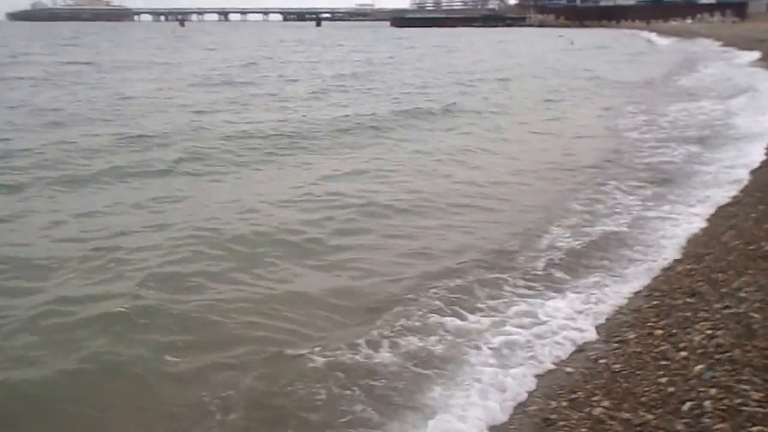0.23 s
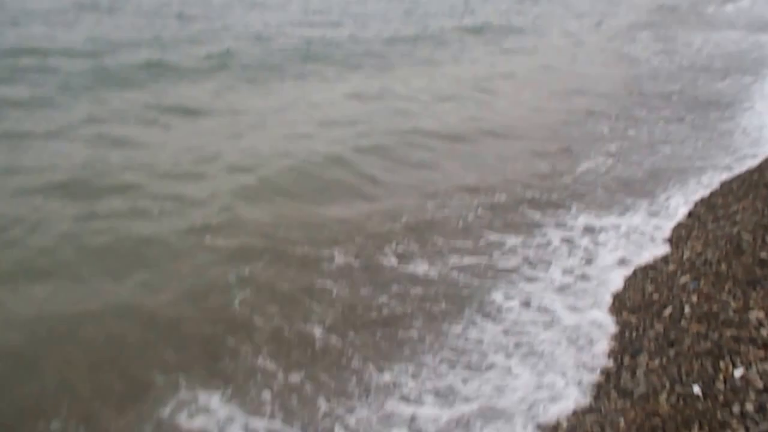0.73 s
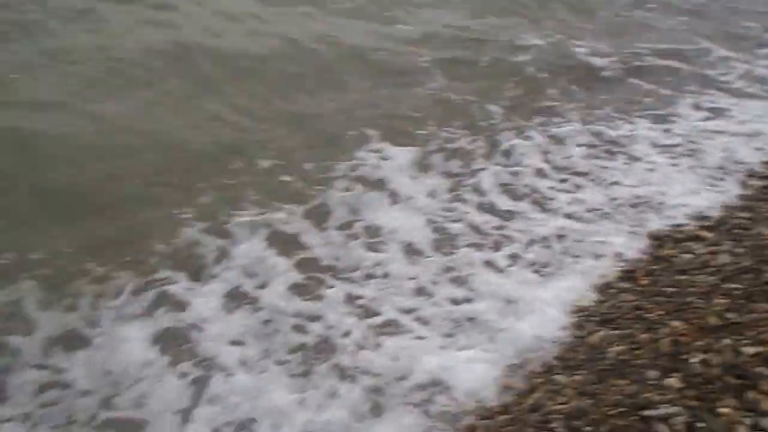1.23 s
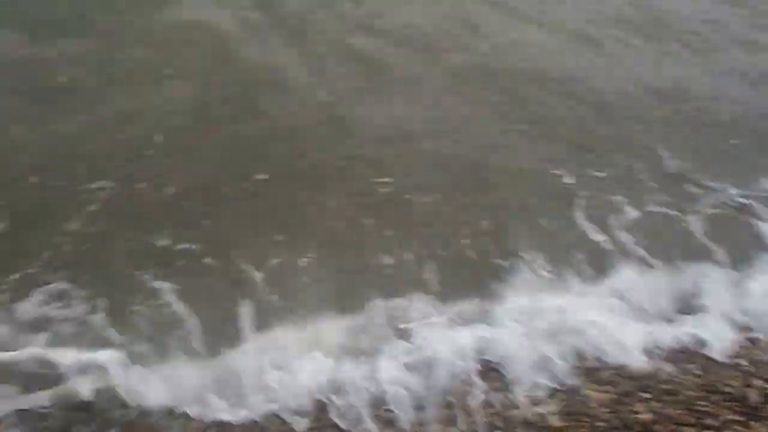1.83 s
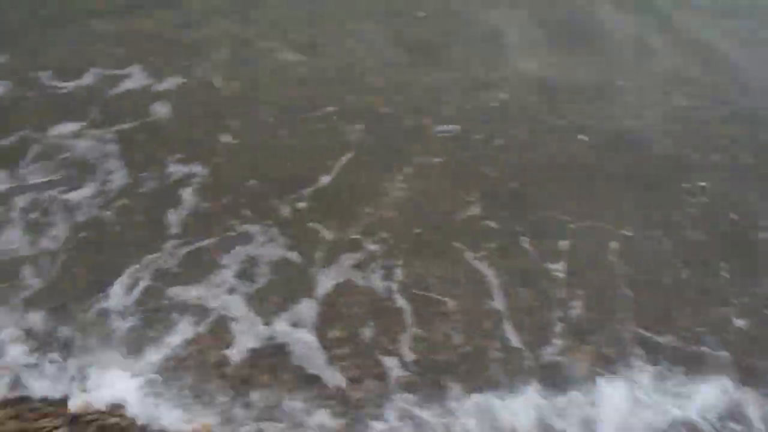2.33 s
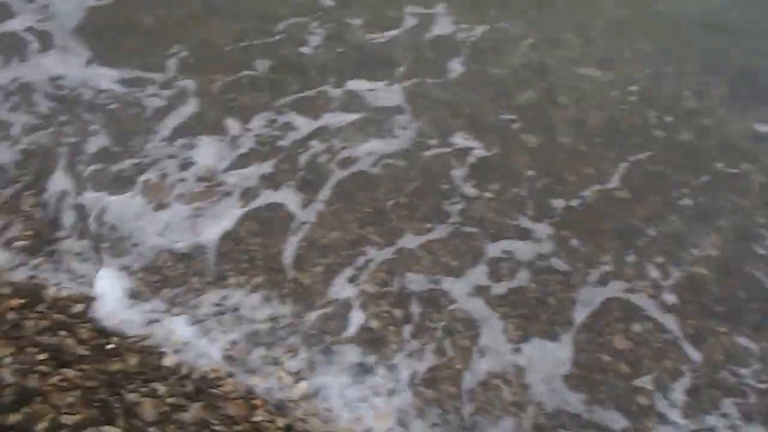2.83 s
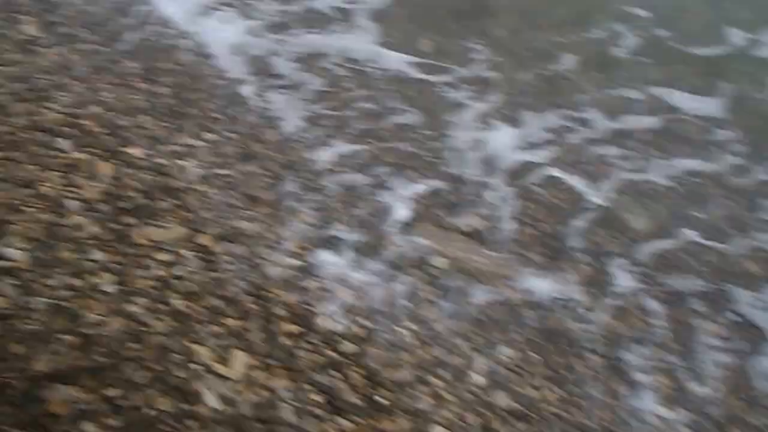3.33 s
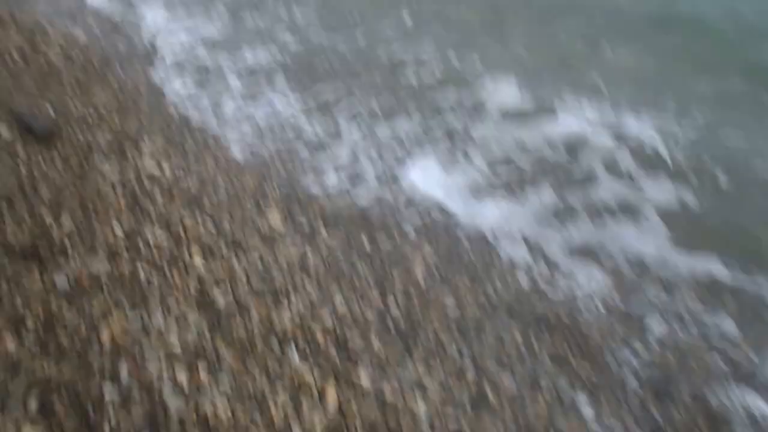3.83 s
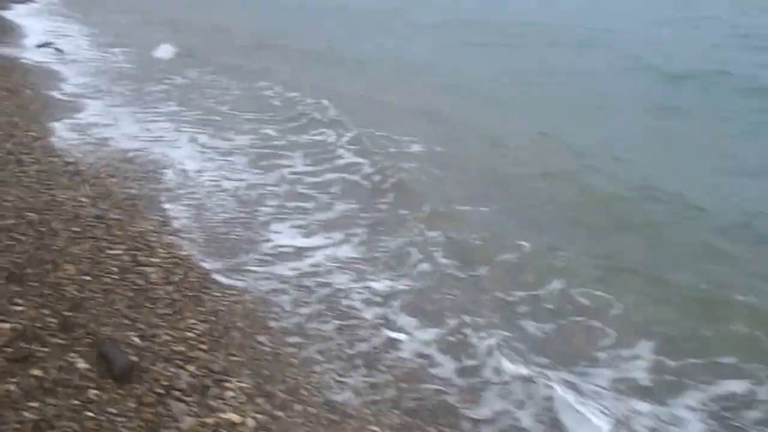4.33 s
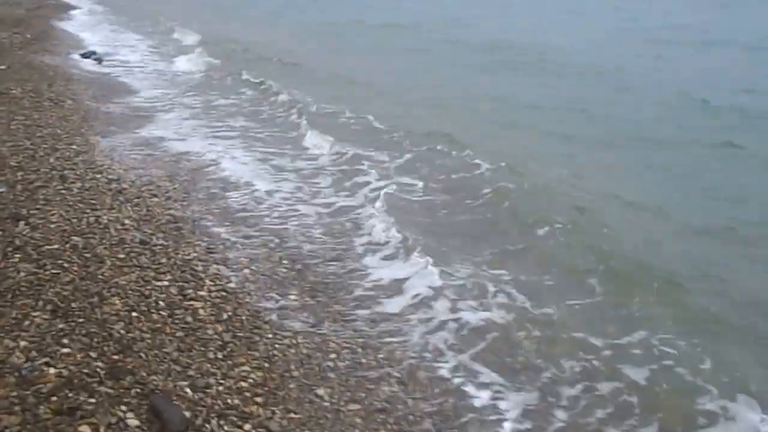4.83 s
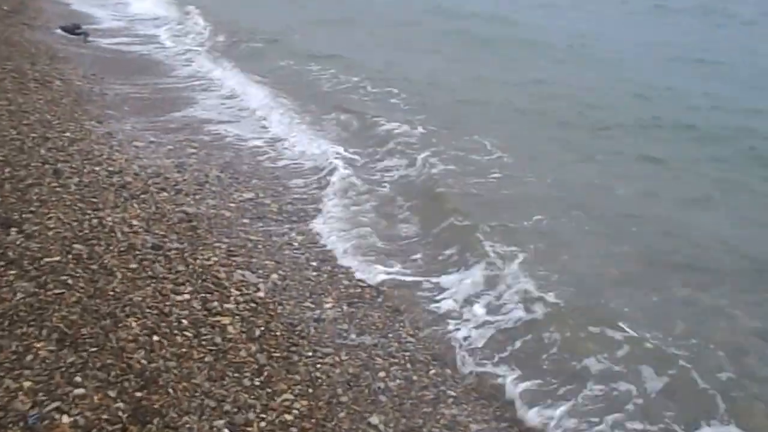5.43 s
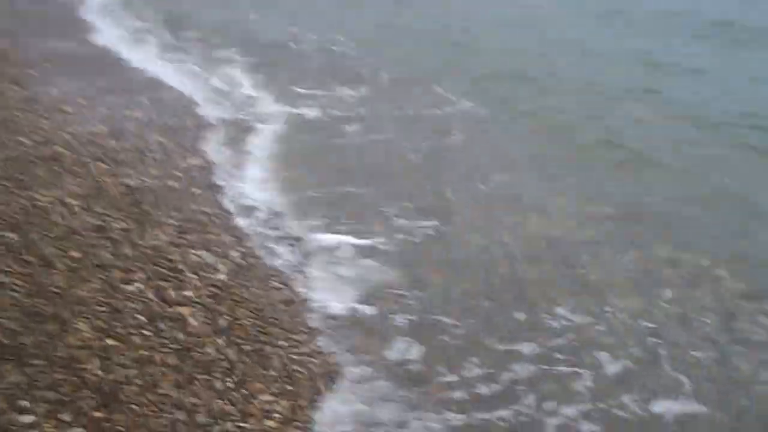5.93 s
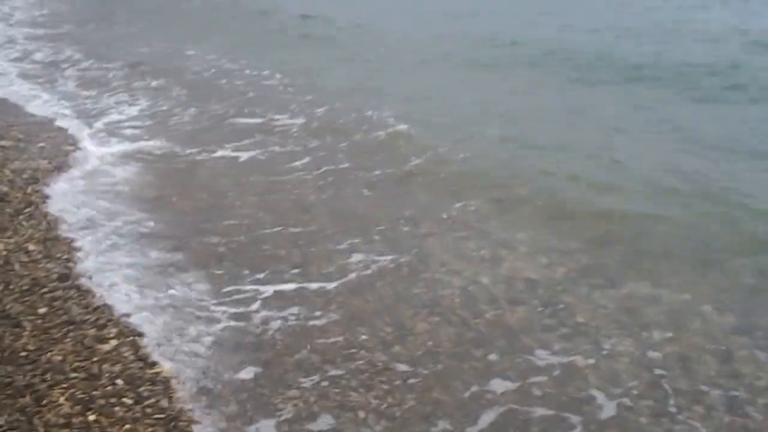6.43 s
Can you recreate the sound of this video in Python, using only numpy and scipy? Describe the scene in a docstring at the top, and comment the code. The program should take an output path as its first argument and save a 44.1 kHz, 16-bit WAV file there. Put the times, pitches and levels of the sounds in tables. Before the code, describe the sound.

Small waves wash continuously over a pebble beach, close to a hand-held mono microphone. The sound opens with a gurgling splash, fizzing foam and a brief crunch underfoot, while wind buffets the microphone until about 0.7 seconds. Several stones clack sharply just after 1 second. Foam swells near 1.8 seconds and another wave spills at 2, with plops and falling drops. The water is softer around 2.6 seconds, where a foot shifts in the shingle. Near 3.4 seconds come a crunch, a clack and several bubble plops, and the wind returns, rumbling and thumping to the end. A fuller wave breaks around 3.8 seconds, its hiss slightly hollow, and foam surges at 4.3 with another clack. Short steps crunch near 4.3, 5 and 6.3 seconds. A further wave splashes and fizzes around 5.8 seconds, followed by a smaller wash near 6.4.

```python
"""Small waves on a pebble beach

Waves spill close to a hand-held mono microphone. Trapped bubbles resonate, higher as they get smaller,
so each crest gurgles, then splashes and sprays, and its foam fizzes over the stones.
Feet shift in the shingle and single stones clack on impact.
Turbulent wind buffets the microphone at the start and again through the second half."""
import sys
import numpy as np
from scipy import signal
from scipy.fft import rfft, irfft, next_fast_len
from scipy.io import wavfile
from scipy.ndimage import uniform_filter1d, map_coordinates

SR = 44100
rng = np.random.default_rng(int(sys.argv[2]) if len(sys.argv) > 2 else 0)


def bounce(signal):
    """Save signal as a 16-bit WAV file at the path given by the first command-line argument."""
    frames = np.transpose(np.atleast_2d(signal))
    limited = np.clip(frames, -1, 1)
    pcm = np.round(limited * 32767).astype(np.int16)
    wavfile.write(sys.argv[1], SR, pcm)


N = 294588
TIME = np.arange(N) / SR
# spectrum of colliding pebbles: frequency_hz, gain_db
PEBBLE_SPECTRUM = [(150, -25), (400, -4), (1000, -0.5), (2200, -2), (4000, 1.5), (6000, 2.5), (8000, -1),
                   (11500, 0.5)]


def surf():
    """Bubble fragmentation: a crest's big bubbles split into smaller ones that resonate higher."""
    # spectra of big, medium and tiny bubbles: frequency_hz, gain_db
    gurgle_spectrum = [(25, -42), (80, -16), (140, -7.5), (260, 0), (450, -0.5), (620, -2), (850, -9),
                       (2000, -33)]
    splash_spectrum = [(200, -54), (480, -11.5), (720, 1), (1000, 1.5), (1300, -2), (1800, -12),
                       (4000, -43)]
    fizz_spectrum = [(1200, -19), (2300, -3.5), (3100, -1), (4300, 0), (5500, -1), (8000, -6),
                     (11500, -3.5)]
    # spectrum of small bubbles: frequency_hz, gain_db
    # its rise at 11 kHz is a faint, thin recorder hiss that follows the splashing
    spray_spectrum = [(600, -22), (1100, -5.5), (1500, 0), (2100, -2), (2700, -6.5), (3600, -10.5),
                      (8000, -28), (11000, -16.5)]
    # the finest hiss, where spray falls on fresh foam: frequency_hz, gain_db
    mist_spectrum = [(3000, -30), (5500, -17), (7500, -5), (11000, 3)]
    gurgle = crest_envelope(lag_in_rises=0, spray_share=0, shore_db=-39)
    splash = crest_envelope(lag_in_rises=0.31, spray_share=0.58, shore_db=-38)
    spray = crest_envelope(lag_in_rises=0.35, spray_share=0.93, shore_db=-36.5)
    fizz = foam_envelope(shore_db=-31.5)
    big = ring_cloud(169, 838, per_s=420, cycles=2.52, glide=0.026, spread_db=0.5)
    medium = ring_cloud(500.6, 1816, per_s=1100, cycles=4.25, glide=0.023, spread_db=1)
    small = ring_cloud(1110, 3510, per_s=2200, cycles=2.2, glide=0.027, spread_db=0.5)
    tiny = ring_cloud(2320, 10880, per_s=3200, cycles=2.5, glide=0.0092, spread_db=3)
    out = gurgle * water(big, gurgle_spectrum, wash_db=7, patch_db=0.6, flicker_db=0.3)
    out += splash * water(medium, splash_spectrum, wash_db=3.5, patch_db=0.17, flicker_db=1)
    out += spray * water(small, spray_spectrum, wash_db=4.5, patch_db=0.82, flicker_db=0.5)
    out += fizz * water(tiny, fizz_spectrum, wash_db=4.5, patch_db=0.5, flicker_db=0.5)
    out += amp(21.5) * spray * fizz * unit(colour(rng.standard_normal(N), mist_spectrum))
    return out + amp(-14.5) * np.sqrt(spray * fizz) * rattle(per_s=70, spread_db=4, ring_s=0.0018)


def crest_envelope(lag_in_rises, spray_share, shore_db):
    """Incoherent addition: for one bubble size, near crests and the steady shoreline sum in power."""
    # spilling crests: gurgle_peak_s, level_db, rise_s, decay_s, spray_over_gurgle_db
    crests = [(0.04, -26.6, 0.15, 0.42, 5), (0.52, -27.5, 0.44, 0.68, 5.5), (2.03, -28, 0.37, 0.29, -0.1),
              (2.62, -37, 0.34, 0.22, -12), (3.421, -31, 0.4, 0.14, 0), (3.83, -26, 0.48, 0.81, -7),
              (4.25, -36.5, 0.19, 0.21, 9), (4.78, -33.3, 0.59, 0.68, 0.7), (5.7, -29, 0.63, 0.28, 7.5),
              (6.33, -35.5, 0.2, 0.42, 6.5)]
    power = sum(swell(peak_s + lag_in_rises * rise_s, db + spray_share * spray_db, rise_s, decay_s)
                for peak_s, db, rise_s, decay_s, spray_db in crests)
    return np.sqrt(power + amp(shore_db) ** 2)


def foam_envelope(shore_db):
    """Incoherent addition: each sheet of foam adds its power to the steady fizz of the shoreline."""
    # foam sliding over the shingle: peak_s, level_db, rise_s, decay_s
    swashes = [(0.04, -17.5, 0.22, 0.74), (0.85, -27, 0.4, 0.18), (1.77, -20, 0.31, 0.53),
               (2.94, -30, 0.078, 0.14), (3.5, -23, 0.67, 1), (4.31, -17, 0.27, 0.19),
               (5.78, -16.9, 0.47, 0.29), (6.35, -20.5, 0.11, 0.28)]
    return np.sqrt(sum(swell(*row) for row in swashes) + amp(shore_db) ** 2)


def water(near_bubbles, spectrum, wash_db, patch_db, flicker_db):
    """Superposition: countless far bubbles merge into Gaussian noise behind the near ones."""
    bubbles = near_bubbles + amp(wash_db) * rng.standard_normal(N)
    return unit(colour(churn(bubbles, patch_db, flicker_db), spectrum))


def churn(x, patch_db, flicker_db):
    """Amplitude modulation: water moves in clumps, so patches of pitch swell and splashes flicker."""
    frames = signal.stft(x, nperseg=512, noverlap=384)[2]
    across_pitch = uniform_filter1d(rng.standard_normal(frames.shape), size=9, axis=0)
    patches = uniform_filter1d(across_pitch, size=18, axis=1)
    flicker = uniform_filter1d(rng.standard_normal(frames.shape[1]), size=7)
    frames *= amp(patch_db * unit(patches) + flicker_db * unit(flicker))
    return signal.istft(frames, nperseg=512, noverlap=384)[1][:N]


def plunges():
    """Collective oscillation: the cloud of air folded in by a crest throbs as one low resonance."""
    # plunging crests: centre_s, level_db, length_s, pitch_hz
    air_clouds = [(0.049, -26, 0.36, 272), (1.9, -37.5, 0.15, 150), (2.058, -31, 0.15, 270),
                  (3.921, -32, 0.063, 270), (4.23, -32.5, 0.13, 276)]
    out = np.zeros(N)
    for centre_s, db, length_s, hz in air_clouds:
        resonance = [(hz / 8, -50), (hz * 0.49, -11), (hz, 0), (hz * 1.6, -11), (hz * 8, -60)]
        add(out, *burst(centre_s, db, length_s, resonance))
    return out


def plops():
    """Bubble resonance: air pockets close under a crest and ring; each falling drop traps a small one."""
    # large single bubbles: start_s, level_db, pitch_hz
    air_pockets = [(1.344, -18, 744), (1.934, -16, 870), (2.062, -17, 277), (3.32, -14, 874),
                   (3.508, -14, 1160), (3.64, -13, 410), (3.672, -16, 665), (3.927, -22.5, 258)]
    # drops falling back from the nearest crest: start_s, level_db, pitch_hz
    drops = [(1.8327, -15, 1990), (1.8994, -22, 3030), (2.0368, -17, 2960), (2.0737, -22.5, 3070),
             (2.1294, -15.5, 2660), (2.1414, -18, 3600), (2.1915, -24, 1650), (2.2438, -17, 1720),
             (2.2657, -15.5, 3630)]
    out = np.zeros(N)
    for start_s, db, hz in air_pockets:
        add(out, start_s, amp(db) * ping(hz, cycles=3.8, glide=0.028))
    for start_s, db, hz in drops:
        add(out, start_s, amp(db) * ping(hz, cycles=10.5, glide=0.025))
    return out


def rattle(per_s, spread_db, ring_s):
    """Shot noise: pebbles rolled by the water collide at random, each tick decaying exponentially."""
    sizes = amp(spread_db * np.minimum(rng.exponential(1, N), 3))
    hits = sizes * (rng.random(N) < per_s / SR)
    power = signal.lfilter([1], [1, -np.exp(-2 / (ring_s * SR))], hits ** 2)
    return unit(colour(np.sqrt(power) * rng.standard_normal(N), PEBBLE_SPECTRUM))


def footsteps():
    """Granular flow: a foot presses into the shingle and sets off a dense avalanche of stone ticks."""
    # presses of a foot: peak_s, level_db, rise_s, decay_s
    presses = [(0.0894, -15.5, 0.03, 0.027), (2.5944, -17.5, 0.022, 0.044), (2.6744, -19, 0.025, 0.037),
               (3.4012, -17.5, 0.024, 0.028), (4.2747, -18.5, 0.024, 0.039), (4.9494, -16.5, 0.028, 0.042),
               (5.2594, -20.5, 0.037, 0.036), (6.2667, -15.5, 0.018, 0.03), (6.2994, -14.5, 0.024, 0.06)]
    power = sum(swell(*row) for row in presses)
    ticks = ring_cloud(588, 10500, per_s=5300, cycles=1.7, glide=0, spread_db=2.5, pitches=16)
    return np.sqrt(power) * unit(colour(ticks + 0.6 * rng.standard_normal(N), PEBBLE_SPECTRUM))


def clacks():
    """Inelastic impact: a stone cracks against another and chatters to rest in four fading contacts."""
    # single stones knocking together: start_s, level_db, pitch_hz
    impacts = [(1.0214, -17, 4680), (1.058, -11, 4860), (1.0654, -17.5, 3920), (1.1247, -14.5, 4520),
               (1.1314, -19, 5360), (1.1734, -15.5, 4390), (2.265, -14.5, 3730), (2.3082, -16.5, 4830),
               (3.404, -9, 3950), (3.59, -21, 3200), (4.368, -9.5, 4370)]
    crack_spectrum = [(1500, -20), (3800, 4), (5000, 7), (11000, 0)]
    out, t = np.zeros(N), np.arange(1024) / SR
    for start_s, db, hz in impacts:
        for contact, (jitter, detune) in enumerate(rng.uniform(-0.55, 1, (4, 2))):
            knock = ping(hz * (1 + 0.16 * detune), cycles=3, glide=0)
            gap_s = 0.0029 + 0.00033 * jitter
            add(out, start_s + contact * gap_s, amp(db - 1.1 * contact) * knock)
        crack = colour(rng.standard_normal(len(t)), crack_spectrum)
        add(out, start_s, amp(db - 5) * np.exp(-t / 0.0048) * crack)
    return out


def wind():
    """Turbulent pressure: gusts rumble unevenly on the microphone, and each strong eddy thumps."""
    # spells of wind: start_s, end_s, level_db, rise_s, release_s
    gusts = [(0.0, 0.75, -33.3, 0.15, 0.0584), (3.418, 6.68, -35.5, 0.58, 0.09)]
    # eddies striking the microphone: centre_s, level_db, length_s
    eddies = [(0.149, -27, 0.026), (0.218, -23.5, 0.025), (0.504, -23, 0.021), (0.594, -24, 0.038),
              (0.654, -24, 0.037), (0.704, -33, 0.03), (4.209, -27.5, 0.042), (4.381, -29, 0.051),
              (4.518, -21, 0.033), (4.679, -32, 0.047), (4.909, -22, 0.026), (4.949, -24, 0.053),
              (4.989, -26.5, 0.043), (5.114, -25.5, 0.031), (5.479, -27.5, 0.023), (5.629, -23, 0.053),
              (5.669, -22.5, 0.031), (5.969, -22, 0.024), (6.019, -26, 0.035), (6.11, -26, 0.057)]
    # spectra of the turbulence and of one eddy: frequency_hz, gain_db
    rumble_spectrum = [(20, -30), (40, -15), (70, -6.5), (130, 1.5), (200, -1), (300, -16), (420, -8.5),
                       (800, -30), (3000, -70)]
    thump_spectrum = [(20, -24), (45, -15), (80, -5.5), (140, 1.5), (230, -0.5), (330, -5), (450, -17),
                      (900, -38), (3000, -70)]
    lull_db, lump_depth_db = -51, 2.7
    push = np.zeros(N)
    for start_s, end_s, db, rise_s, release_s in gusts:
        ramps = np.minimum((TIME - start_s) / rise_s, 1 - (TIME - end_s) / release_s)
        push += amp(db) * np.clip(ramps, 0, 1)
    lumps = unit(colour(rng.standard_normal(N), [(2, -4), (8, -8), (22, -11), (50, -31), (200, -100)]))
    rumble = unit(colour(rng.standard_normal(N), rumble_spectrum) * amp(lump_depth_db * lumps))
    out = np.hypot(push, amp(lull_db)) * rumble
    for centre_s, db, length_s in eddies:
        add(out, *burst(centre_s, db, length_s, thump_spectrum))
    return out


def reflect(x):
    """Comb filtering: a small surface returns only the treble, late and inverted, so hiss turns hollow."""
    # a close reflection as the microphone turns along the shore: time_s, extra_path_m, strength
    reflection = [(2.65, .176, 0), (2.95, .176, .2), (3.4, .172, .18), (3.65, .168, .3), (4.0, .165, .32),
                  (4.2, .14, .25), (4.35, .128, .2), (4.5, .12, 0)]
    sound_speed_m_s = 343
    time_s, extra_path_m, strength = np.transpose(reflection)
    delay_s = np.interp(TIME, time_s, extra_path_m) / sound_speed_m_s
    treble = colour(x, [(900, -35), (1700, -3.5)])
    echo = map_coordinates(treble, [np.arange(N) - delay_s * SR], order=3)
    return x - np.interp(TIME, time_s, strength) * echo


def ring_cloud(lo_hz, hi_hz, per_s, cycles, glide, spread_db, pitches=20):
    """Random superposition: many small rings of scattered moment and size, even in power per Hz."""
    slot = 32  # samples; each holds at most one onset per pitch
    out, slot_starts = np.zeros(N), np.arange(N // slot) * slot
    for hz in np.geomspace(lo_hz, hi_hz, pitches):
        chance, size_draw, place = rng.random((3, len(slot_starts)))
        occurs = chance < per_s / pitches * slot / SR
        sizes = amp(spread_db * np.minimum(-np.log(size_draw + 1e-9), 4))
        signs = rng.choice([-1, 1], len(sizes))
        onsets = np.zeros(N)
        onsets[slot_starts + (place * slot).astype(int)] = occurs * sizes * signs
        rings = signal.oaconvolve(onsets, ping(hz, cycles, glide))[:N]
        out += np.sqrt(hz) * unit(rings)
    return unit(out)


def ping(hz, cycles, glide):
    """Damped oscillation, down to 1/e after `cycles`; a bubble glides up as it nears the surface."""
    age = np.arange(int(5 * cycles * SR / hz) + 2) * hz / SR / cycles  # in decay times
    attack = 1 - np.exp(-2 * age * cycles)
    phase = 2 * np.pi * cycles * age * (1 + glide * age / 2)
    return attack * np.exp(-age) * np.sin(phase)


def burst(centre_s, db, length_s, spectrum):
    """Gaussian windowing shapes a puff of coloured noise; returns its start time and its sound."""
    t = np.arange(-SR // 4, SR // 4) / SR
    window = np.exp(-(2 * t / length_s) ** 2)
    puff = unit(colour(rng.standard_normal(len(t)) * window, spectrum))
    gain = amp(db) * np.sqrt(length_s / np.ptp(t))
    return centre_s + t[0], gain * puff[t >= -centre_s]


def swell(peak_s, db, rise_s, decay_s):
    """Near-exponential growth and decay of power around a peak."""
    from_peak = np.maximum((peak_s - TIME) / rise_s, (TIME - peak_s) / decay_s)
    return amp(db) ** 2 * np.exp(-2 * from_peak ** 1.19)


def colour(x, spectrum):
    """Linear filtering by multiplication in the frequency domain."""
    size = next_fast_len(len(x) + 2048)
    gain = gain_at(spectrum, np.fft.rfftfreq(size, 1 / SR))
    return irfft(rfft(x, size) * gain, size)[:len(x)]


def gain_at(spectrum, hz):
    """Interpolation of a spectrum on a log-frequency axis."""
    frequency_hz, gain_db = np.transpose(spectrum)
    return amp(np.interp(np.log(hz + 1), np.log(frequency_hz), gain_db))


def add(mix, start_s, sound):
    """Superposition of a sound on the mix."""
    part = mix[max(round(start_s * SR), 0):][:len(sound)]
    part += sound[:len(part)]


def amp(db):
    """Decibels to amplitude ratio."""
    return 10 ** (np.asarray(db) / 20)


def unit(x):
    """Normalisation to rms 1."""
    return x / np.sqrt(np.mean(x ** 2) + 1e-20)


def scene():
    """Superposition of shore and wind at one microphone; the level dips briefly near the start."""
    # the brief dip in level: time_s, gain_db
    dip = [(.217, 0), (.222, -4), (.24, -8), (.255, -0.5)]
    mono = reflect(surf()) + plunges() + footsteps() + clacks() + plops() + wind()
    mono *= amp(np.interp(TIME, *np.transpose(dip)))
    return np.array([mono, mono])


def record(dry):
    """Band limiting: a narrow-band recorder has falling treble with three nulls, then a steep edge."""
    # treble roll-off: frequency_hz, gain_db
    roll_off = [(4000, -1), (5000, -2), (6000, -4.5), (6600, -7), (7750, -8.5), (9250, -12.5),
                (10750, -8.5), (11300, -25)]
    # nulls of the low-pass: frequency_hz
    nulls = [7000, 8500, 10000]
    null_width_hz, edge_hz = 700, 11520
    size = next_fast_len(N + 4096)
    hz = np.fft.rfftfreq(size, 1 / SR)
    notches = np.prod([abs(hz - f) / np.hypot(hz - f, null_width_hz) for f in nulls], axis=0)
    dull = irfft(rfft(dry, size) * gain_at(roll_off, hz) * notches, size)[:, :N]
    low_pass = signal.firwin(401, edge_hz, window=("kaiser", 9), fs=SR)
    return signal.oaconvolve(dull, low_pass[None], "same")


dry = scene()
out = record(dry)
bounce(out)
```